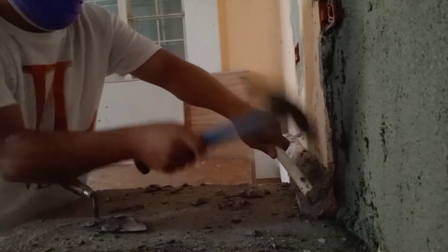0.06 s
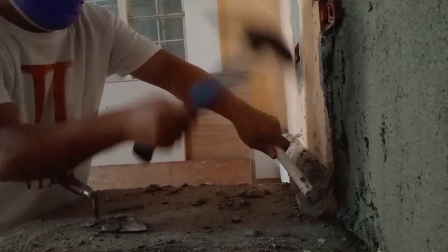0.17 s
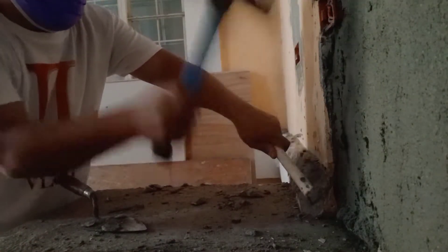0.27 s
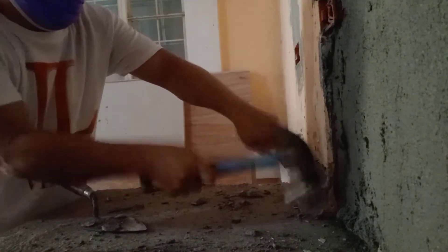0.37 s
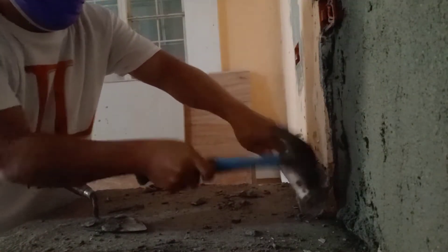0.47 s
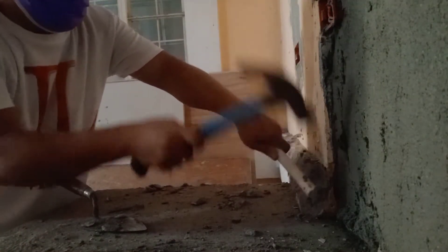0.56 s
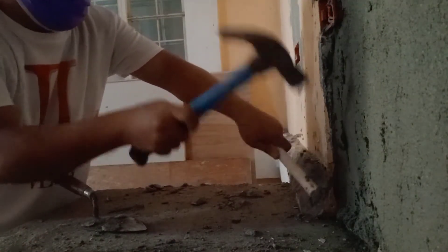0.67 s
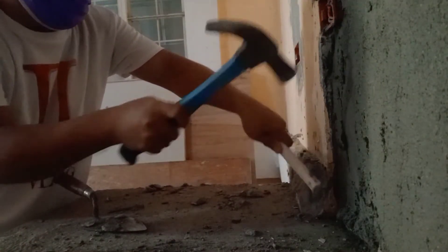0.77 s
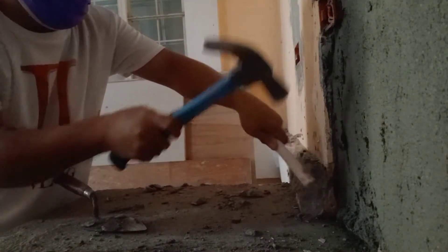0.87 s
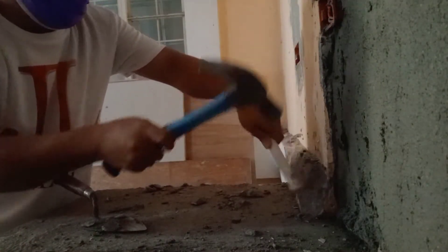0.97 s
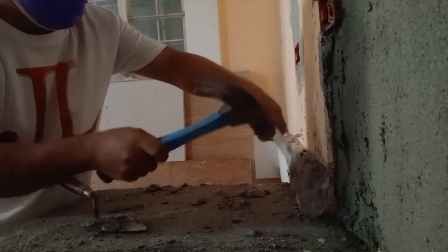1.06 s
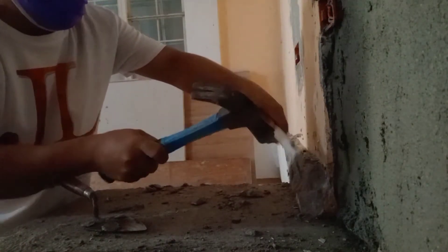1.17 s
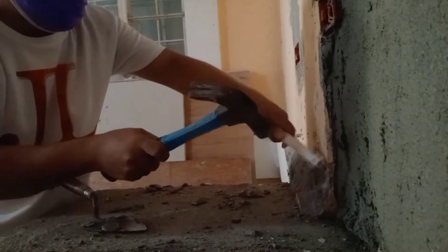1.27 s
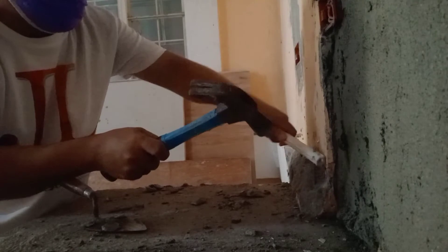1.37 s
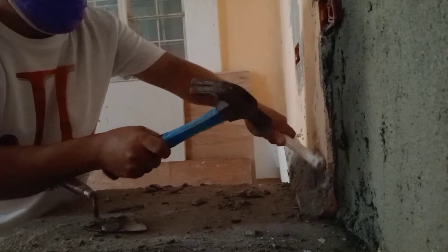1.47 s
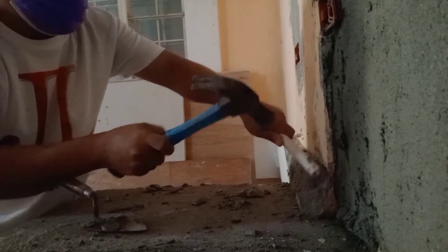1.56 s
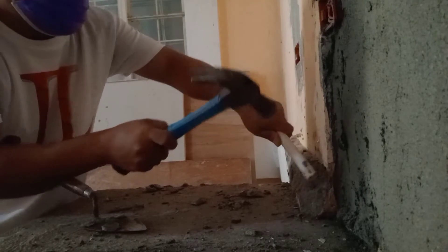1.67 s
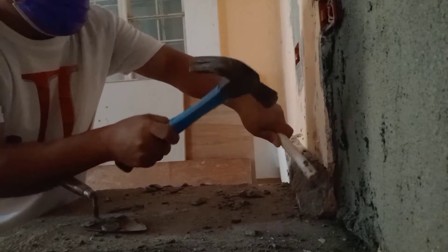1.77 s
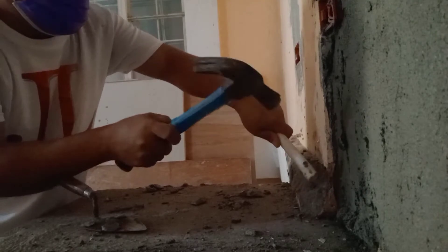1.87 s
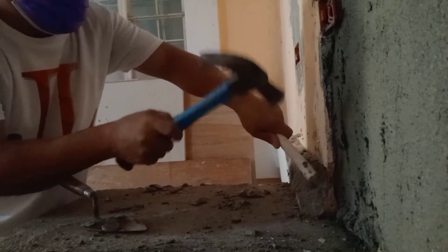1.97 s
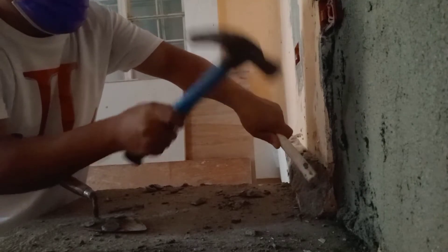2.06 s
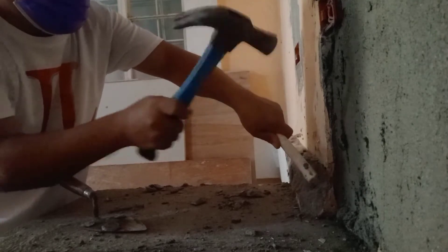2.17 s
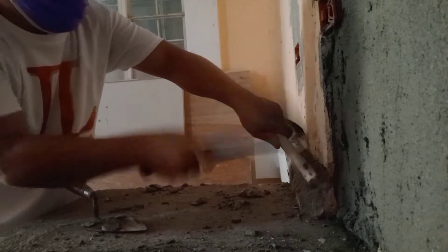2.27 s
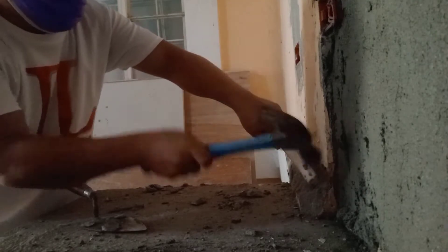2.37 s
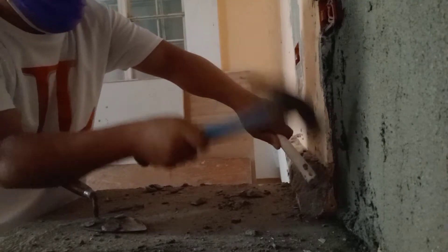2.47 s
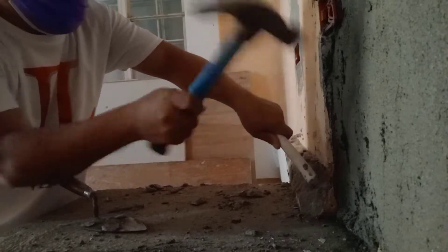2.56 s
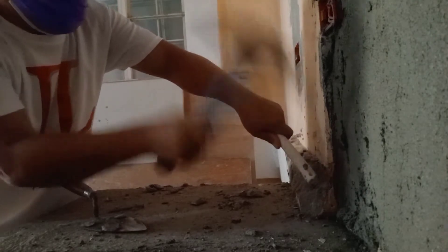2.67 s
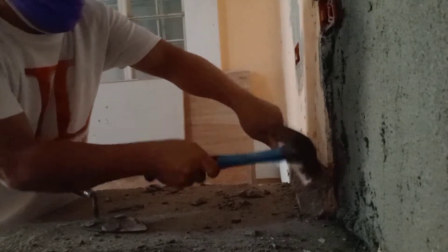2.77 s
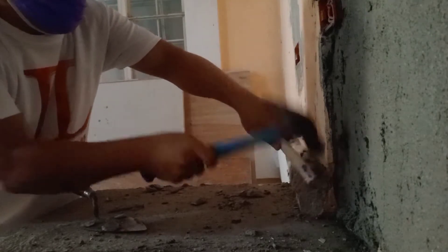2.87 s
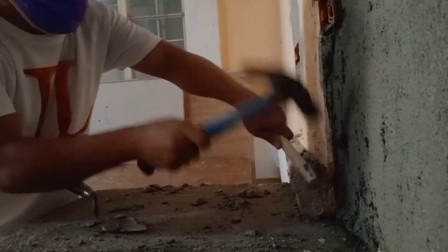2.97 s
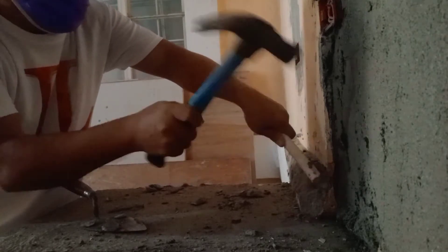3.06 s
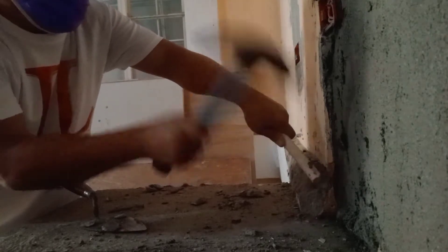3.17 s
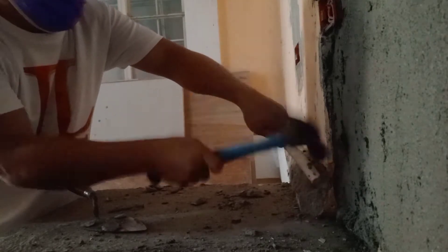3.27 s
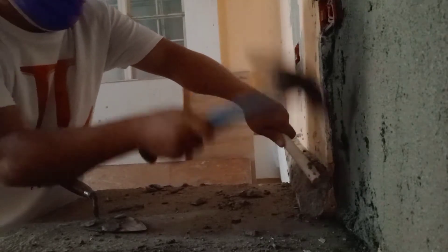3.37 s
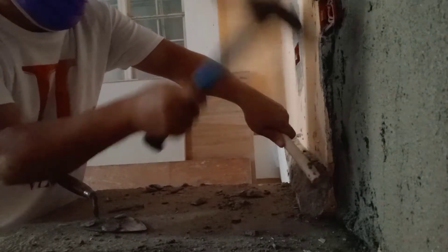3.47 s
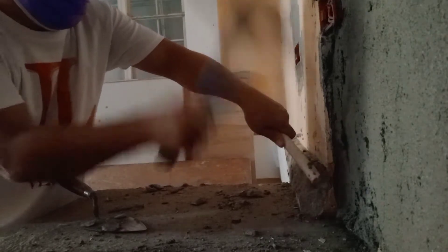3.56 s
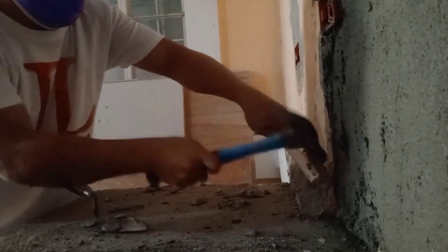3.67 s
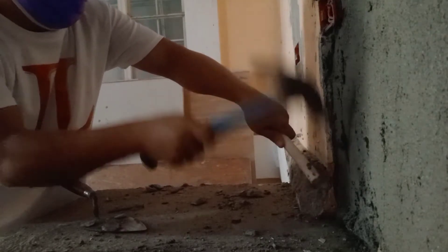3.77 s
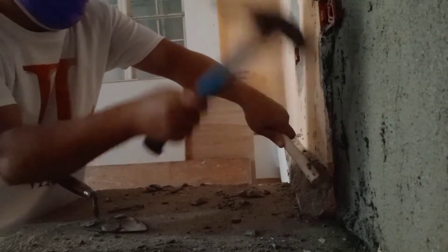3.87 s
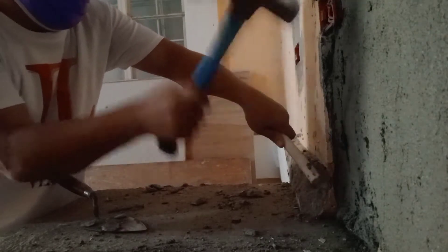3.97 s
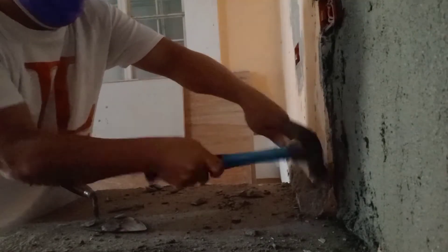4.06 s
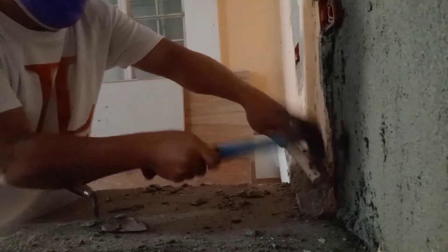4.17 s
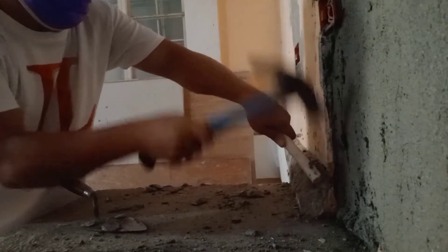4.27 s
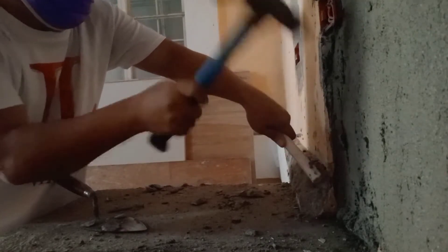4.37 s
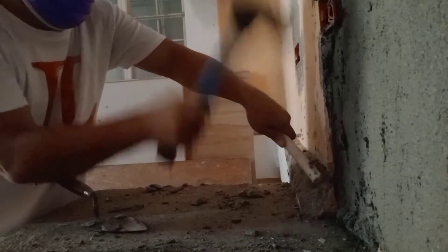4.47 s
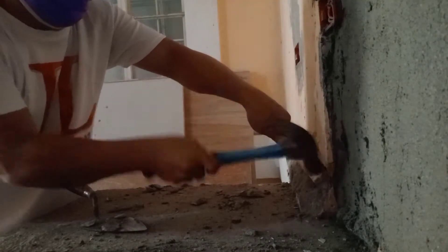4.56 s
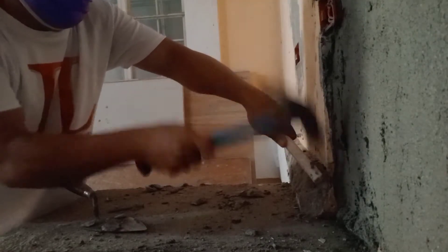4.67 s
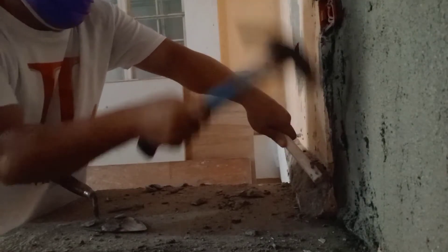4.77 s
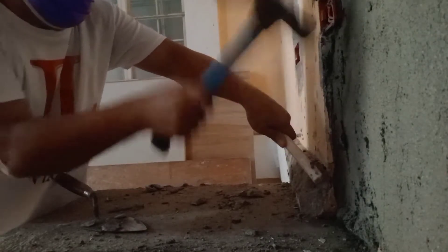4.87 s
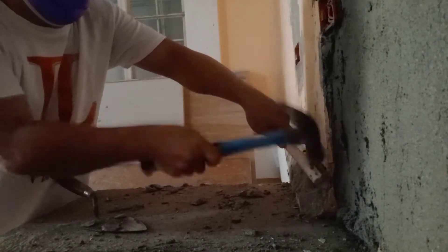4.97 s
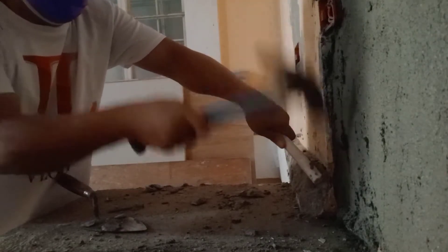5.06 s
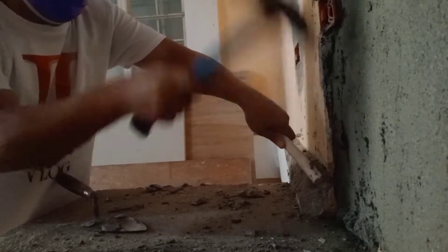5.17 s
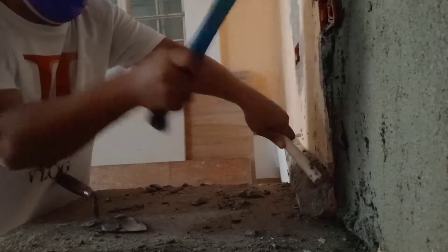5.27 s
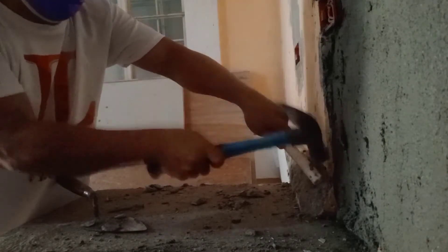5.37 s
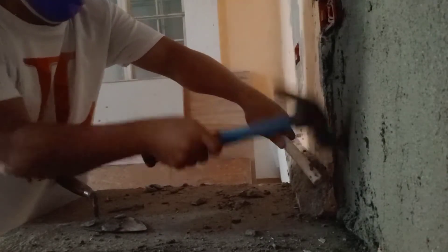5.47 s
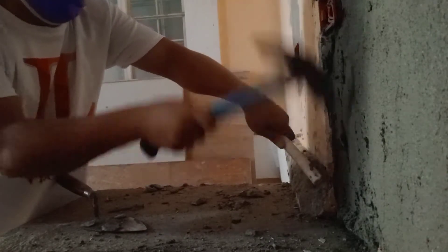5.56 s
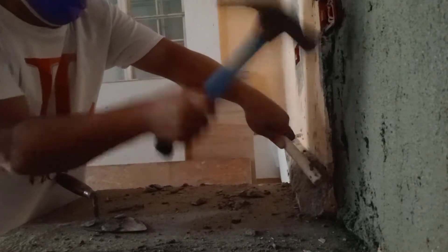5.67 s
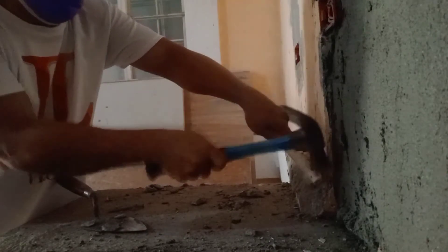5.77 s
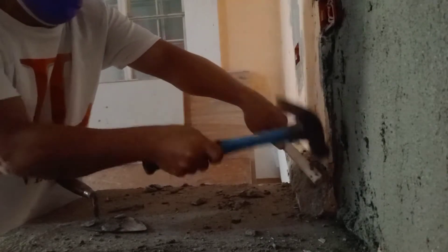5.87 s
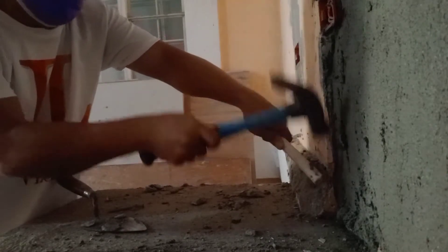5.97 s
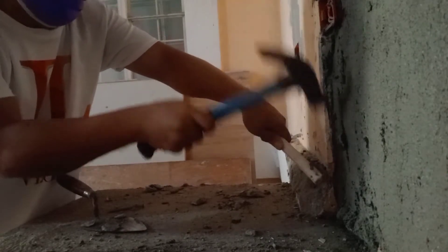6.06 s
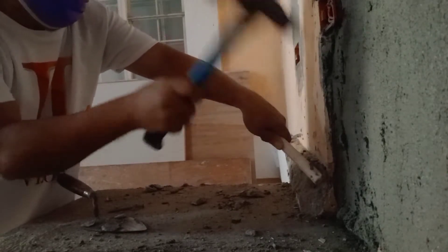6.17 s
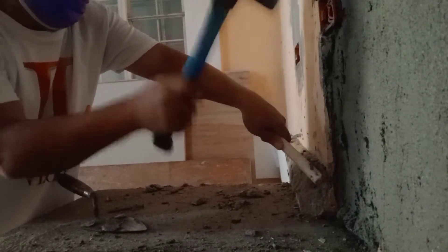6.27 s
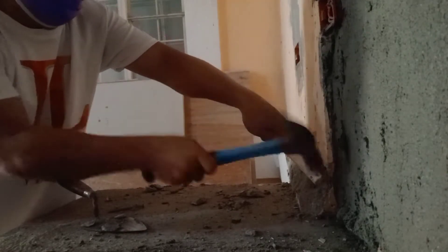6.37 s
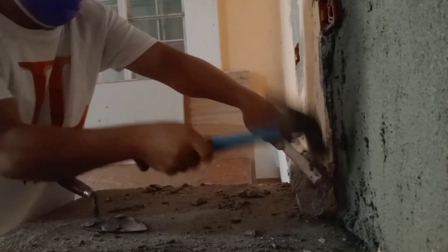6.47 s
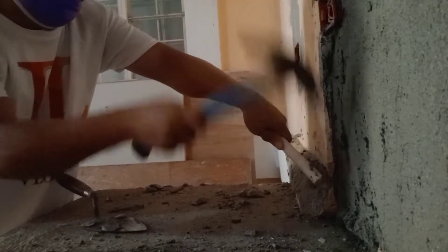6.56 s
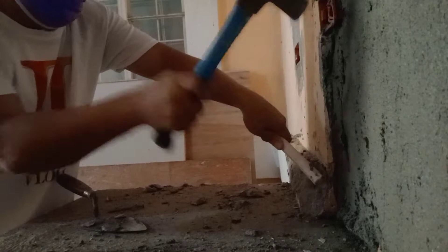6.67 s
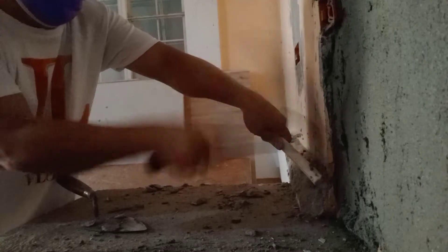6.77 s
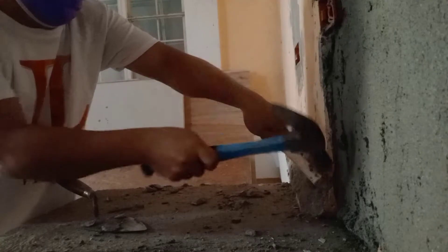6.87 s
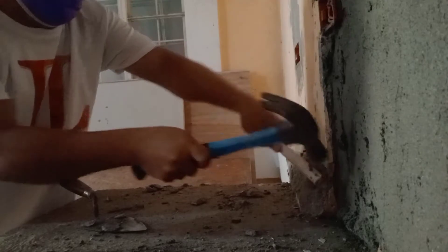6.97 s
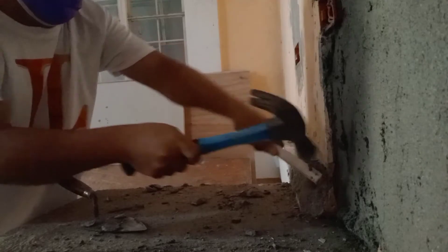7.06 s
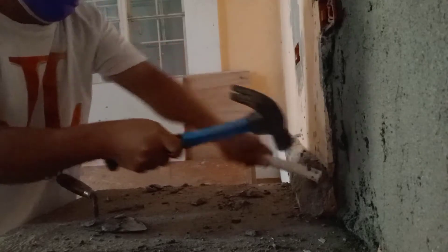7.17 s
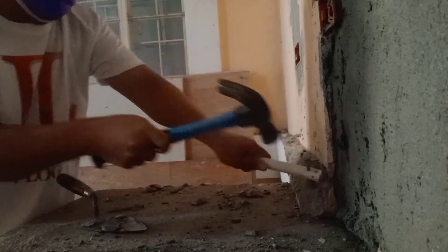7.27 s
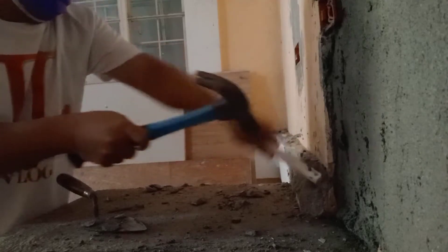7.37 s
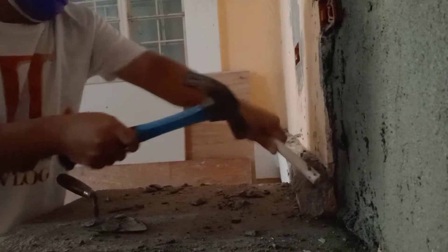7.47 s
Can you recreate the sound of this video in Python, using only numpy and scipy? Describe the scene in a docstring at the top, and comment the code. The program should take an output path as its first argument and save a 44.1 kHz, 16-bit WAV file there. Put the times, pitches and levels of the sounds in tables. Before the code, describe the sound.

A bare, echoing room with faint steady hiss and low building rumble, heard close up. At 0 s the metallic ring of a hammer blow is already fading; at 0.35 s another sharp, bright blow lands on the steel chisel. From 0.7 to 1.3 s the tip makes faint skidding ticks, light gritty scrapes and a soft low bump. A clearer scrape comes around 2.0 s. Blows resume at 2.3 and 2.7 s, with a low bump between, then continue at 3.2, 3.6, 4.0, 4.5, 4.95, 5.35, 5.75, 6.35 and 6.75 s. Each is a hard crack with concrete crunch, steely ring and half-second echo, varying in brightness and clang; the last is duller. Small scrapes slip between some. Dull, booming thumps follow near 6.8, 7.1 and 7.5 s, the first mostly masked. Overloaded peaks duck the sound, and the room tail swells back after each.

```python
"""A hammer drives a steel chisel into concrete in a bare, echoing room, over faint hiss and rumble.
We start in the ring of one blow and soon hear another: noise cracks, decaying modes and room echo.
In the pause, noise grains scrape, short ticks skid and low modes bump; then blows follow steadily.
Near the end three dull thumps of filtered noise and wall modes come through the building.
A limiter ducks at the loud blows, so the room swells up behind each sharp crack."""
import sys
import numpy as np
from scipy import signal
from scipy.fft import rfft, irfft
from scipy.io import wavfile
from scipy.ndimage import uniform_filter1d, minimum_filter1d

SR = 44100
rng = np.random.default_rng(int(sys.argv[2]) if len(sys.argv) > 2 else 0)


def store_pcm(level_fs):
    """Save levels as 16-bit WAV."""
    pcm = np.round(np.clip(level_fs, -1, 1) * 32767).astype(np.int16)
    wavfile.write(sys.argv[1], SR, np.atleast_2d(pcm).T)


N = 332054  # samples in the scene
AGE = np.arange(SR) / SR  # seconds since an impact


def amp(db):
    """Turns decibels into a plain gain."""
    return 10 ** (np.asarray(db) / 20)


def unit(x):
    """Scales a signal to an average (rms) strength of 1."""
    return x / np.sqrt(np.mean(x ** 2) + 1e-20)


def read(points, hz):
    """Joins (Hz, value) points with straight lines on a log-frequency axis."""
    point_hz, value = np.transpose(points)
    return np.interp(np.log(hz + 1), np.log(point_hz + 1), value)


def add(mix, start_s, sound):
    """Mixes a sound in at a start time; a negative time cuts off its beginning."""
    start = round(start_s * SR)
    sound = sound[max(-start, 0):]
    part = mix[max(start, 0):][:len(sound)]
    part += sound[:len(part)]


def colour(x, points, size=4096):
    """Filters with the given spectrum, without sounding early; white noise keeps its power."""
    hz = abs(np.fft.fftfreq(size, 1 / SR))
    gain = unit(amp(read(points, hz)))
    # minimum phase: the filter answers as early as it can
    response = np.exp(signal.hilbert(np.log(gain + 1e-6)).conj())
    taps = np.fft.ifft(response).real
    return signal.oaconvolve(x, taps[:size // 2])[:len(x)]


def burst(fade_s):
    """Noise that dies away from the moment of impact."""
    return rng.standard_normal(SR) * np.exp(-AGE / fade_s)


def push(width_s):
    """One swing of pressure and its slower return."""
    u = AGE / width_s
    return u * (u - 2) * np.exp(-u)


def bell(hz, centre_hz, half_width_hz):
    """A resonant hump of height 1."""
    return 1 / (1 + ((hz - centre_hz) / half_width_hz) ** 2)


def ring(modes, waver=.5, size=900):
    """Half a second of decaying modes; reflections make each one waver in strength and phase."""
    t = AGE[:SR // 2]
    out = np.zeros(len(t))
    for pitch_hz, level_db, t60_s in modes:
        wander = rng.standard_normal((2, len(t)))
        a, b = (unit(uniform_filter1d(v, size=size)) for v in wander)
        turn = 2 * np.pi * pitch_hz * t
        wave = (1 + waver * a) * np.sin(turn) + waver * b * np.cos(turn)
        out += amp(level_db - 60 * t / t60_s) * wave
    return np.pad(out / np.sqrt(1 + 2 * waver ** 2), (0, SR - len(t)))


# how fast the room's echo dies at each pitch: pitch_hz, t60_s (time to fall by 60 dB)
ROOM_DECAY = [(80, 0.9), (200, 0.56), (500, 0.52), (1200, 0.49), (3000, 0.45), (8000, 0.39), (15000, 0.31)]


def room_tail():
    """Dense reflections from bare walls, each band dying at its own speed."""
    hz, t, bands = signal.stft(rng.standard_normal(SR), SR, nperseg=256)
    fading = bands * amp(-60 * t / read(ROOM_DECAY, hz)[:, None])
    tail = signal.istft(fading, SR, nperseg=256)[1][:SR]
    return tail * (1 - np.exp(-AGE / 0.0041))


# steady hiss of the background: pitch_hz, level_db (per Hz, relative)
HISS_TONE = [(30, -32), (70, -27), (140, -30), (300, -11), (640, -5), (1400, -2.5), (2000, 1), (3300, 1.5),
             (4800, -7), (6500, -13), (7700, -9), (8600, 0), (10000, -14.5), (12300, -17.5), (15400, -14)]


def background(hiss_db=-46.5, drift_db=2.4, rumble_db=-56, shake_db=-40, shake_fade_db_per_s=18):
    """Slightly drifting hiss over the low rumble of the building, which each blow stirs up."""
    t = np.arange(N) / SR
    drift = np.zeros(N)
    for drift_hz in np.geomspace(.5, 7, 20):
        drift += np.sin(2 * np.pi * (drift_hz * t + rng.random())) / np.sqrt(drift_hz)
    hiss = amp(hiss_db + drift_db * unit(drift)) * colour(rng.standard_normal(N), HISS_TONE)
    rumble = colour(rng.standard_normal(N), [
        (40, -81), (90, -8.5), (140, 3.5), (210, -6.5),
        (320, -11.5), (900, -17.5), (2500, -33), (8000, -71)])
    shakes = [(t >= s) * amp(shake_db - shake_fade_db_per_s * abs(t - s)) for s, *_ in BLOWS]
    return hiss + np.hypot(amp(rumble_db), np.max(shakes, axis=0)) * rumble


def contact_crack(crack_db, bite_db, contact_db=19, snap_db=22):
    """The head snaps against the chisel, concrete crunches under its tip, and a deep bite knocks."""
    contact = amp(contact_db) * burst(0.0011) * (1 - np.exp(-AGE / 0.0018))
    add(contact, .0008, amp(snap_db) * push(.00004))
    crack = colour(amp(crack_db) * contact, [
        (40, -21.0), (150, 11.5), (800, 9), (3000, -9),
        (6000, -18.5), (8500, -41.0), (11500, -54), (15000, -15.0)])
    knock_hz, knock_fade_s, knock_delay_s = 429, .003, 0.0016
    concrete = np.sin(2 * np.pi * knock_hz * AGE) * np.exp(-AGE / knock_fade_s)
    add(crack, knock_delay_s, amp(-7.5 + 0.83 * bite_db) * concrete)
    return crack


# tone of the echo of a blow on chisel and concrete: pitch_hz, level_db (per Hz, relative)
STRIKE_TONE = [(45, -71), (80, -13.5), (135, -9.5), (205, 2.5), (320, -6), (620, -3), (1250, -4.5),
               (1850, -9), (3100, -10), (4450, -20), (5750, -29), (7250, -29), (8450, -20), (9450, -29.5),
               (10300, -33), (12400, -37.5), (15200, -29.5)]
# masonry modes rung by every blow: pitch_hz, level_db (relative), t60_s
MASONRY_MODES = [(589, -22, 0.51), (819, -28, 0.23), (1073, -24, 0.6), (1170, -21.5, 0.42),
                 (1238, -20.5, 0.36), (2125, -26.5, 0.46), (2220, -31, 0.3), (2830, -22, 0.23),
                 (3245, -29.5, 0.49), (712, -29, 0.43), (942, -28, 0.48), (1400, -34, 0.41),
                 (1647, -29, 0.52), (2500, -36, 0.51), (2750, -27, 0.36)]
# rough modes of the chisel tip, which follow the sizzle: pitch_hz, level_db (relative), t60_s
TIP_MODES = [(8070, -34, 0.34), (7950, -64, 0.5), (9100, -37.5, 0.37)]


def blow_echoes(early_db=1.0, room_db=-11.0):
    """Nearby wall and floor reflect first, then the room; masonry and chisel tip ring along."""
    reflections = amp(early_db) * burst(0.0087) + amp(room_db) * room_tail()
    echoes = colour(reflections, STRIKE_TONE)
    echoes += ring(MASONRY_MODES, waver=1.0)
    return echoes + ring(TIP_MODES, waver=1.5, size=200)


# a chisel that bites hard concrete sounds brighter: pitch_hz, gain_db (per dB of bite)
BITE_TONE = [(1200, 0), (2500, .5), (4000, 1), (8500, 0.6), (14000, 0)]


def seat(x, bite_db, free_db, fizz_db, clang_hz):
    """The seat of the chisel colours a blow: bite brightens it, a loose grip lets it clang and sizzle."""
    hz = np.fft.rfftfreq(2 * SR, 1 / SR)
    shape_db = bite_db * read(BITE_TONE, hz)
    fizz_hz = 11800  # the top fizz sets in around here
    shape_db += fizz_db * (1 - 1 / (1 + (hz / fizz_hz) ** 8))
    shape_db += (4.7 + 0.3 * free_db) * bell(hz, clang_hz, 130)
    shape_db += (4.23 + 0.56 * free_db) * bell(hz, 8800, 2130)  # sizzle
    return irfft(rfft(x, 2 * SR) * amp(shape_db))[:SR]


# lowest mode of the steel chisel, damped by the fist: pitch_hz, level_db (relative), t60_s
CHISEL_LOW_MODE = [(4926, -24, 0.41)]
# higher modes of the same chisel: pitch_hz, level_db (relative), t60_s
CHISEL_HIGH_MODES = [(7095, -38, 0.33), (9450, -36, 0.29)]


def chisel_ring(bite_db, free_db):
    """The steel rings: its lowest mode grows with the bite, its higher ones with a loose hold."""
    low = amp(-2.5 + 1.15 * bite_db) * ring(CHISEL_LOW_MODE, waver=4.2, size=300)
    high = amp(5.8 + free_db) * ring(CHISEL_HIGH_MODES, waver=2.7, size=600)
    return low + high


# hammer blows: start_s, force_db, crack_db (contact), push_db (low push of the overloaded microphone),
# bite_db (into the concrete), free_db (free ring of the steel), fizz_db (top fizz), clang_hz;
# all levels are relative
BLOWS = [ (-.06, 4, 0, 0, -5, 14.5, 9, 2660), (.3543, 3, 1.5, -1, 11.5, -1, 7, 2400),
         (2.2938, 0.5, 3, 3, -0.5, 5, 12.5, 2370), (2.709, 3, -6, 6.5, 9, 3.5, 15, 2930),
         (3.2214, -0.5, -8.5, -2.5, -2.5, 17, 8, 2240), (3.6314, 3.5, 0, -38, -3, 1, 19, 2370),
         (4.0415, 3.5, 0.5, 0.5, 10, 4, 5, 2040), (4.523, 1, 3, 4, 9, 6, 14, 2580),
         (4.9485, 4.5, -4, -16.5, 1, -0.5, 8, 2870), (5.3632, 4.5, -4.5, 1.5, 5.5, -1.5, 0, 3100),
         (5.7409, 3.5, -1.5, -4.5, 8.5, 7, 3, 2150), (6.3507, 5, 0, -2, 0.5, -4, 16.5, 2260),
         (6.7692, 7.5, -19, -11.5, 3.5, -10, -1, 2930)]


def hammer(push_base_db=14):
    """Each blow: a crack of steel, wall, floor and room echo, ringing, the overloaded microphone's push."""
    out = np.zeros(N)
    high_pass = signal.butter(3, 70, "high", fs=SR, output="sos")
    shove = signal.sosfilt(high_pass, push(0.00081))
    for start_s, force_db, crack_db, push_db, bite_db, free_db, fizz_db, clang_hz in BLOWS:
        knock = contact_crack(crack_db, bite_db) + blow_echoes()
        knock = seat(knock, bite_db, free_db, fizz_db, clang_hz)
        low_push = amp(push_base_db + push_db) * shove
        add(out, start_s, amp(force_db) * (knock + chisel_ring(bite_db, free_db) + low_push))
    return out


# the chisel tip chatters over the concrete: start_s, length_s, level_db (relative), pitch_hz
SKIDS = [(0.724, .01, -29, 2230), (0.806, .11, -32, 2800), (1.263, .01, -27.5, 2930),
         (1.294, .01, -34, 2900)]


def skids(chatter_s=.0242, room_db=-15, side_hz=520):
    """The skidding tip ticks against the stone, one short noise burst every chatter_s seconds."""
    out = np.zeros(N)
    for start_s, length_s, level_db, hz in SKIDS:
        stone = [(hz / 8, -22), (hz / 2, -13), (hz - side_hz, -4), (hz, 0),
                 (hz + side_hz, -8), (2 * hz, -25), (5 * hz, -42)]
        for delay_s in np.arange(0, length_s, chatter_s):
            tick = burst(0.0076) + amp(room_db) * room_tail()
            add(out, start_s + delay_s, amp(level_db) * colour(tick, stone))
    return out


# gritty scrapes: middle_s, half_length_s, level_db (relative)
SCRAPES = [(0.85, 0.067, -42), (1.07, 0.086, -47), (1.226, 0.046, -39.5), (2.02, 0.055, -29),
           (2.545, 0.016, -39.5), (3.45, 0.031, -40), (4.366, 0.096, -44), (6.618, 0.054, -32.5)]
# tone of the crunching grit: pitch_hz, level_db (per Hz, relative)
GRIT_TONE = [(210, -18), (720, -11), (1350, -4), (2150, 4.5), (3150, 7), (4250, 0.5), (5600, -12),
             (6800, -13), (8450, -4), (10600, -21), (15100, -21)]


def scrapes(grains_per_s=5500, room_db=-3.0, slip_db=1.5):
    """Sand grains crunch under the sliding steel: random clicks swell and fade with the pressure."""
    t = np.arange(N) / SR
    pressure = sum(amp(db) * np.exp(-((t - middle) / half) ** 2) for middle, half, db in SCRAPES)
    # the tip sticks and slips
    slip = unit(uniform_filter1d(rng.standard_normal(N), size=350))
    pressure = pressure * amp(slip_db * slip)
    grains = rng.standard_normal(N) * (rng.random(N) < grains_per_s / SR)
    crunch = pressure * unit(grains)
    room = signal.oaconvolve(crunch, unit(room_tail()) / np.sqrt(SR))[:N]
    return colour(crunch + amp(room_db) * room, GRIT_TONE)


# soft low bumps: start_s, level_db (of each mode, relative), base_hz (between the two modes), t60_s
BUMPS = [(0.944, -38, 146.8, 0.52), (2.11, -42.5, 166.6, 0.78), (2.455, -9, 222, 0.2)]


def bumps():
    """Soft bumps each ring a close pair of low modes."""
    out = np.zeros(N)
    for start_s, level_db, base_hz, t60_s in BUMPS:
        pair = [(base_hz * 0.79, level_db, t60_s), (base_hz * 1.1, level_db, t60_s)]
        add(out, start_s, ring(pair, waver=0.73) * (1 - np.exp(-AGE / 0.018)))
    return out


# dull thumps through the building: start_s, knock_db (noise part), boom_db (wall part), relative
THUMPS = [(6.806, -45, 5.5), (7.122, -13, 5.5), (7.465, -10.5, 11)]
# tone of the noise part: pitch_hz, level_db (per Hz, relative)
THUMP_TONE = [(50, -37), (100, 10.5), (220, 21.5), (340, 8.5), (650, 14.5), (1300, 9.5), (2000, 1.5),
              (3200, -1.5), (5000, -21.5), (8500, -25), (12000, -34)]
# booming modes of the wall: pitch_hz, level_db (relative), t60_s
WALL_MODES = [(106.7, -19.5, 0.63), (206.7, -12.5, 0.3)]


def thumps(room_db=-6.5):
    """Heavy blows elsewhere make a dull burst of noise and set the wall booming."""
    out = np.zeros(N)
    for start_s, knock_db, boom_db in THUMPS:
        noise = burst(0.04) + amp(room_db) * room_tail()
        knock = colour(noise, THUMP_TONE) * (1 - np.exp(-AGE / 0.002))
        boom = ring(WALL_MODES, waver=0.12) * (1 - np.exp(-AGE / 0.035))
        add(out, start_s, amp(knock_db) * knock + amp(boom_db) * boom)
    return out


def scene():
    """All sources at the one microphone."""
    return (background() + hammer() + skids() + scrapes() + bumps() + thumps())[None]


def record(dry, limit_db=-9.0, recover_s=0.11, fade_db_per_s=1200, ceiling=2.7,
           start_duck_db=10.0, edge_hz=15600):
    """A limiter fades down just before loud sound and recovers slowly; soft overload; treble cut."""
    x, t = dry[0], np.arange(N) / SR
    level_db = 10 * np.log10(abs(uniform_filter1d(x ** 2, size=130)) + 1e-12)
    over_db = np.maximum(level_db - limit_db, 1e-4)
    over_db[0] = max(start_duck_db, 1)  # the first blow has just ducked the gain
    # after each peak the ducking dies away exponentially
    duck_db = np.exp(np.maximum.accumulate(np.log(over_db) + t / recover_s) - t / recover_s)
    # looking ahead (backwards in time), it ramps down before each peak
    fade = t * fade_db_per_s
    duck_db = np.maximum.accumulate(duck_db[::-1] + fade)[::-1] - fade[::-1]
    gain = uniform_filter1d(minimum_filter1d(amp(-duck_db), size=560), size=130)
    y = ceiling * np.tanh(x * gain / ceiling)
    low_pass = signal.firwin(401, edge_hz, window=("kaiser", 8), fs=SR)
    return signal.oaconvolve(y, low_pass, "same")[None]


dry = scene()
out = record(dry)
store_pcm(out)
```